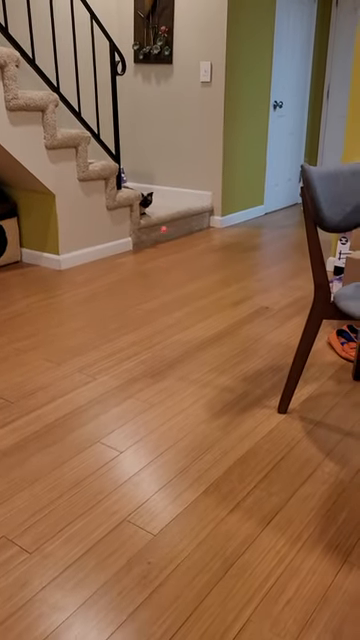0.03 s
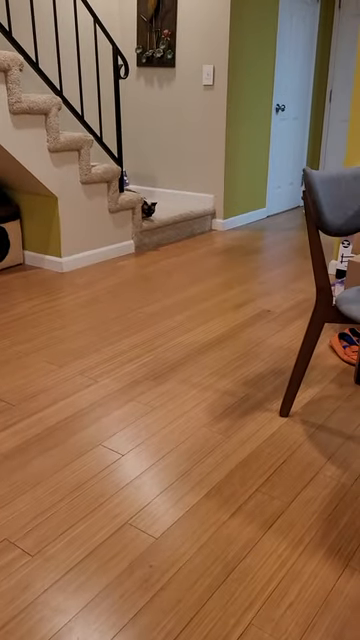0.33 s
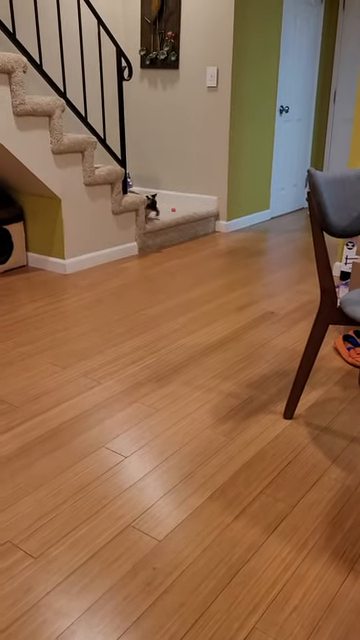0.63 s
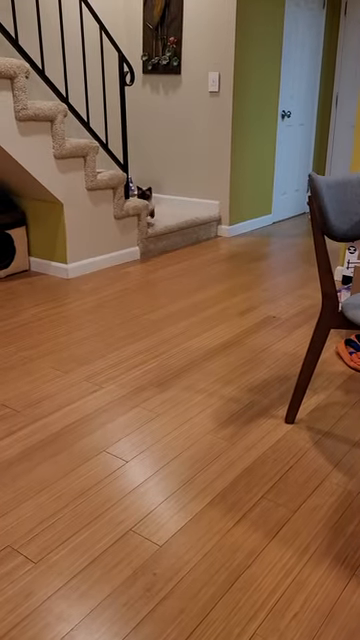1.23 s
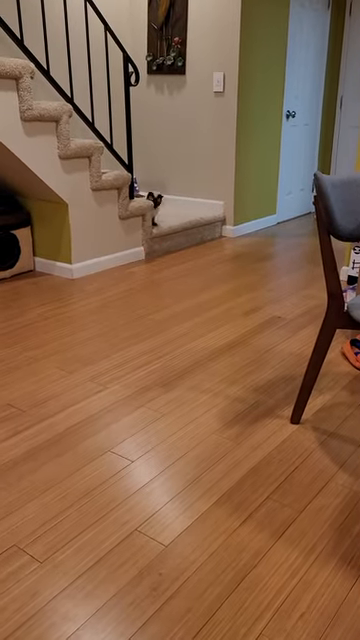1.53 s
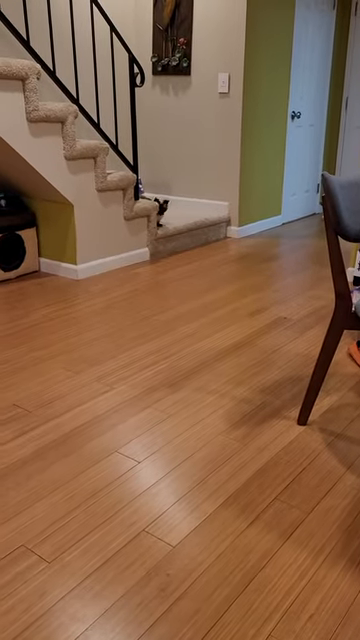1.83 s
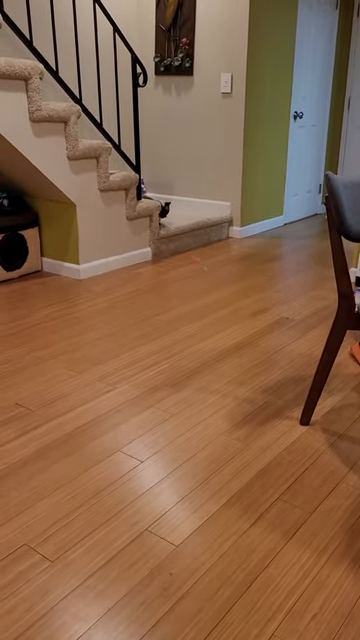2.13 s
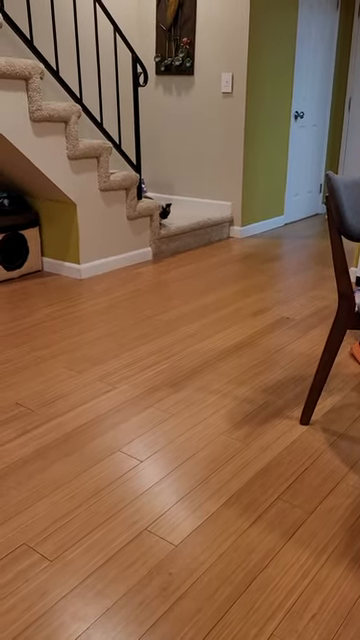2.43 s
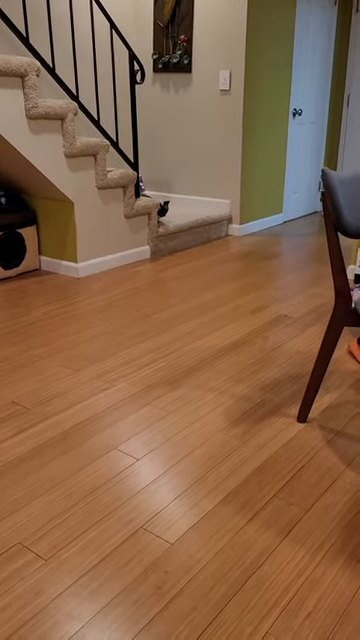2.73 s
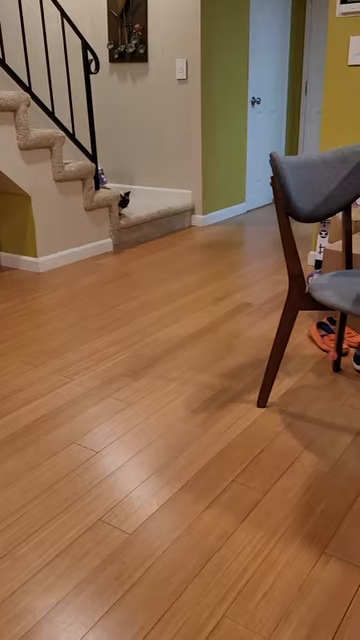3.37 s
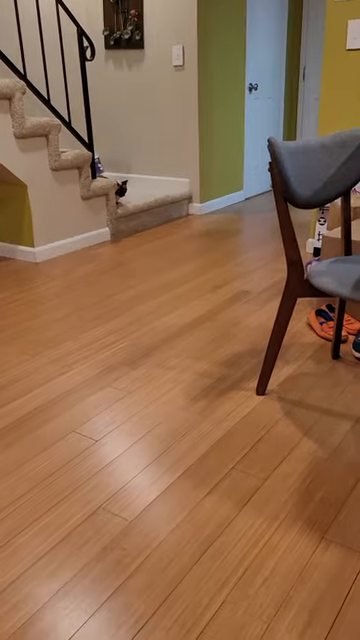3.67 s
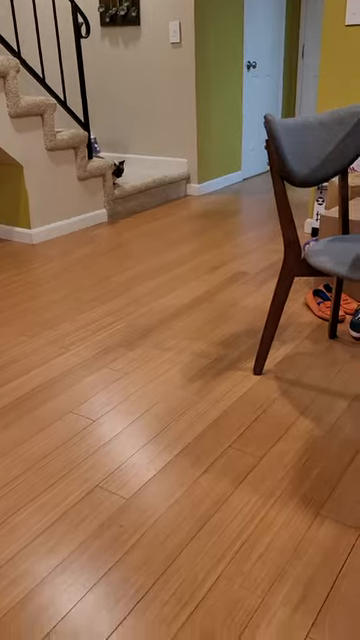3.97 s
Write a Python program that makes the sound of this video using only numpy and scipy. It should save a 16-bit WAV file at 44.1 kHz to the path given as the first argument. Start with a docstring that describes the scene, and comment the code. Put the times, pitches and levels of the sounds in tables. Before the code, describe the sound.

A small ball bounces on a wooden floor about twice a second, quickening toward the end. Each hollow thump sounds slightly different and rings briefly in a quiet living room, a few metres from the microphone.

```python
"""Ball bouncing in a living room

A small ball bounces again and again on a wooden floor, a few metres from a stereo microphone.
Each landing briefly rings the boards, a little differently at each spot, and the ball adds its own
tock; the room carries the thud on for a third of a second. Behind it: low rumble, hiss, appliance
hum, a thin electrical whine and, near the end, one tiny click close by."""
import sys
import numpy as np
from scipy import signal
from scipy.io import wavfile
from scipy.ndimage import uniform_filter1d

SR = 44100
rng = np.random.default_rng(int(sys.argv[2]) if len(sys.argv) > 2 else 0)


def file_out(sig):
    """Save sig as 16-bit WAV at sys.argv[1]."""
    # one column per channel
    cols = np.atleast_2d(sig).T
    # limit, then scale
    lim = np.clip(cols, -1, 1)
    pcm = np.round(lim * 32767).astype(np.int16)
    wavfile.write(sys.argv[1], SR, pcm)


N = 176400

# how alike the room's diffuse sound is on the two sides of the microphone: frequency_hz, correlation
STEREO_LIKENESS = [(60, 0.76), (200, 1), (340, .1), (520, -0.077), (1200, -0.47), (2000, -0.51),
                   (3200, -0.11), (10000, -0.24)]


def from_db(db):
    """Decibels to gain."""
    return 10 ** (np.asarray(db) / 20)


def rms_one(x):
    """Scale to rms 1."""
    return x / np.sqrt(np.mean(x ** 2) + 1e-20)


def at_hz(points, hz):
    """Read a table on a log-frequency axis."""
    frequencies, values = np.transpose(points)
    return np.interp(np.log(hz), np.log(frequencies), values)


def pan(db):
    """Left and right gains for a level difference; positive leans left."""
    return from_db(np.array([[db], [-db]]) / 2)


def add(out, x, start_s):
    """Mix x into out from start_s, dropping what falls outside the scene."""
    start = int(start_s * SR)
    a, b = max(start, 0), min(start + x.shape[-1], N)
    if b > a:
        out[:, a:b] += x[..., a - start:b - start]


def resonance(x, hz, width_hz):
    """A steep-sided resonance with gain 1 on top."""
    low = np.sqrt(hz ** 2 + width_hz ** 2 / 4) - width_hz / 2
    edges = np.clip([low, low + width_hz], 5, .48 * SR)
    return signal.sosfilt(signal.butter(2, edges, "band", fs=SR, output="sos"), x + 1e-18)


def diffuse_bands(size):
    """Third-octave bands of noise, alike on both sides in the bass and partly opposed higher up."""
    edges = 22 * 2 ** (np.arange(30) / 3)
    centres = np.sqrt(edges[1:] * edges[:-1])
    for hz, width in zip(centres, np.diff(edges)):
        mid, side = resonance(rng.standard_normal((2, size + SR // 4)), hz, width)[:, -size:]
        alike = at_hz(STEREO_LIKENESS, hz)
        mid, side = np.sqrt((1 + alike) / 2) * mid, np.sqrt((1 - alike) / 2) * side
        yield hz, width, np.array([mid + side, mid - side])


def landing(thump_hz, knock_hz, clack_hz, knock_db, clack_db, *group_db):
    """One blow rings boards and ball; the microphone hears them directly and through the room."""
    # resonances heard at every landing: the floor's boom, overtones and tick, and the ball's own tock
    # (1967 Hz, grouped with the overtones): pitch_hz, width_hz, level_db, direct_db
    landing_modes = { "boom": [(113, 110, -27, 4), (187.5, 54, -11, -13.5), (253, 87, -5.5, 7)],
                     "overtones": [(1041, 200, -23, 4), (1270, 180, -22, 2.5), (1630, 290, -22.5, -9),
                     (1967, 299, -27, 8.5), (2805, 450, -35.5, 2.5), (3623, 690, -43, -2.5),
                     (5037, 1200, -51.5, -3.5)], "tick": [(5564, 910, -52.5, -12.5),
                     (8090, 510, -55.5, -9.5), (12000, 5000, -66, -12.5)]}
    # the board under the ball: spot_db, pitch_hz, width_hz, level_db, direct_db
    modes = [(0, thump_hz, 171.7, 0.8, 0),
             (knock_db, knock_hz, 133, -0.5, 0),
             (clack_db, clack_hz, 181, -24.5, 11.8)]
    for group, spot_db in zip(landing_modes.values(), group_db):
        modes += [(spot_db, *mode) for mode in group]
    blow = signal.unit_impulse(4096)
    t = np.arange(len(blow)) / SR
    impact, direct = 0, 0
    for spot_db, hz, width, db, direct_db in modes:
        contact_hz = min(2.32 * hz, .45 * SR)   # the soft contact rounds off each resonance above this
        soft_blow = signal.sosfilt(signal.butter(2, contact_hz, fs=SR, output="sos"), blow)
        ring = from_db(db + spot_db) * resonance(soft_blow, hz, width)
        travel_s = 0.00053 * np.sqrt(1000 / hz)   # lower bending waves cross the boards more slowly
        ring = np.interp(t - travel_s, t, ring, left=0)
        impact = impact + ring
        right_lag_s = 0.00027 if hz < 900 else 0   # the bass reaches the right side later
        right = np.interp(t - right_lag_s, t, ring)
        direct = direct + from_db(direct_db - 8.5) * np.array([ring, right])
    room = reverberation() + standing_waves() + wall_echoes()
    out = signal.fftconvolve(room, impact[None], axes=1)
    out[:, :len(t)] += direct
    return out


def reverberation():
    """Dense reflections from one spot on the floor build up and die away, with even energy per hertz."""
    # decay of the living room: frequency_hz, t60_s
    decay_times = [(100, 0.15), (250, 0.44), (450, 0.34), (900, 0.39), (1800, .35), (3500, 0.33),
                   (7000, 0.17), (14000, 0.31)]
    delay_s, build_s, early_t60_s = 0.0014, .004, .13
    t = np.arange(SR // 2) / SR
    build = 1 - np.exp(-np.maximum(t - delay_s, 0) / build_s)
    early = 0.17 * from_db(-60 * t / early_t60_s)   # off nearby walls and furniture
    out = 0
    for hz, width, noise in diffuse_bands(len(t)):
        tail = from_db(-60 * t / at_hz(decay_times, hz))
        band = noise * build * (tail + early)
        energy = np.sum(band ** 2, axis=1, keepdims=True)
        out = out + band * np.sqrt(2 * width / SR / energy)
    return out


def standing_waves():
    """Every landing stirs a few room modes that stand out of the tail."""
    # standing waves of the room: pitch_hz, level_db
    room_modes = [(401, 7), (749, 4.5), (928, 4.5), (1023, 3), (1299, 0), (1569, 3), (1897, 10.5),
                  (2164, 6), (2702, 2), (2902, 9), (2993, 2.5)]
    t60_s, lag_rad = 0.24, np.array([[0], [1.84]])   # the right side lags
    t = np.arange(SR // 2) / SR
    rate = np.log(1000) / t60_s
    waves = sum(from_db(db) * np.sin(2 * np.pi * hz * t - lag_rad) for hz, db in room_modes)
    return 2 * rate / SR * np.exp(-rate * t) * waves


def wall_echoes():
    """Single reflections, whose paths change a little with each spot and reach the two sides apart."""
    # distinct echoes from the walls: delay_s, level_db, left_over_right_db
    echoes = [(.007, -15, -2), (0.022, -13, 2), (.035, -15.5, -2), (.049, -20, -3)]
    out = np.zeros((2, SR // 2))
    for delay_s, db, side_db in echoes:
        arrival = (delay_s * rng.uniform(.95, 1.05, 2) * SR).astype(int)
        out[[0, 1], arrival] += from_db(db) * pan(side_db)[:, 0]
    return out


def ball():
    """The ball strikes a new spot each time, a few metres off; the scene opens in a landing's tail."""
    # landings and how each one rings: start_s, strength_db, left_over_right_db,
    # thump_hz, knock_hz, clack_hz, knock_db, clack_db, boom_db, overtones_db, tick_db
    landings = [ (-0.105, 1.5, 0, 348, 567, 1500, -8, -7, -5.5, -5, -15),
                (0.409, -2, -1.5, 405, 645, 1120, -1, -1, -5, -6.5, -5.5),
                (0.9055, 1, -0.5, 443, 634, 1860, 0.5, -12, 1, 1.5, -2),
                (1.559, 1.5, -0.5, 427, 714, 2790, -1.5, -4.5, 3, 8.5, 6),
                (2.0244, -1, -.5, 388, 660, 1842, -8, -7.5, -0.5, -3.5, -1.5),
                (2.4732, 1, -0.5, 355, 646, 1837, -7, -7, -12, 0.5, 11),
                (2.888, 0, -1, 323, 605, 1843, -7.5, -12.5, -12, -8.5, -2.5),
                (3.2828, -1.5, -0.5, 440, 846, 1340, -5, 13, 0.5, 9.5, 7),
                (3.615, 1.5, -1.5, 349, 540, 1407, -22, -9, -11.5, -9.5, -12),
                (3.9448, -4, -0.5, 438, 582, 1797, -18, 6, -1.5, 4.5, -7)]
    gain_db = 22
    out = np.zeros((2, N))
    for start_s, db, side_db, *spot in landings:
        add(out, from_db(gain_db + db) * pan(side_db) * landing(*spot), start_s)
    return out


def room_tone():
    """Low rumble all round the microphone, and a hiss that settles in the first second and a half."""
    # spectrum of the quiet room: frequency_hz, relative_density_db
    spectrum = [(25, -13), (42, -19), (60, -12.5), (90, 8.5), (130, -15), (250, -0.5), (400, -17.5),
                (700, -11), (1100, -31), (2500, -38.5), (5000, -43.5), (9000, -51), (15000, -51.5)]
    # lift of the hiss above 1 kHz: time_s, gain_db
    hiss_lift = [(0, 18), (.35, 11.5), (0.801, 11), (1.401, 9), (4, 9)]
    hiss = from_db(np.interp(np.arange(N) / SR, *np.transpose(hiss_lift)))
    out = 0
    for hz, _, noise in diffuse_bands(N):
        band = from_db(at_hz(spectrum, hz) - 48.5) * noise
        out = out + band * (hiss if hz > 1000 else 1)
    return out


def appliance_hum():
    """Household appliances hum in three narrow bands of noise, with a band of whine high above."""
    # bands of hum and whine: pitch_hz, width_hz, level_db
    bands = [(55.7, 6.4, -76), (88.5, 16, -82), (518.4, 6.9, -81), (7400, 370, -99)]
    out = 0
    for hz, width, db in bands:
        left, unrelated = resonance(rng.standard_normal((2, N + SR)), hz, width)[:, SR:]
        alike = at_hz(STEREO_LIKENESS, hz)
        right = alike * left + np.sqrt(1 - alike ** 2) * unrelated
        out = out + from_db(db) * rms_one(np.array([left, right]))
    return out


def electrical_whine():
    """Thin electrical tones that wander slightly in pitch and slowly fade."""
    # tones of the whine: pitch_hz, midway_level_db
    tones = [(3661, -101), (5103, -110), (7025, -105), (7143, -98.5), (7323, -99)]
    wander_hz, fade_db_per_s, lag_rad = 5, 1.9, np.array([[0], [.8]])   # the right side lags
    t = np.arange(N) / SR
    out = 0
    for hz, db in tones:
        wander = wander_hz * rms_one(uniform_filter1d(rng.standard_normal(N), size=2000))
        phase = 2 * np.pi * np.cumsum(hz + wander) / SR - lag_rad
        out = out + from_db(db) * np.sqrt(2) * np.sin(phase)
    return out * from_db(-fade_db_per_s * (t - t.mean()))


def whistle():
    """A faint, narrow whistling hiss that swells near the end."""
    # swell of the whistle: time_s, level_db
    swell = [(0, -87), (2.601, -89.5), (3.201, -84.5), (4, -84.5)]
    level = from_db(np.interp(np.arange(N) / SR, *np.transpose(swell)))
    return level * rms_one(resonance(rng.standard_normal((2, N)), hz=3800, width_hz=170))


def stray_click():
    """A tiny dry click close to the microphone."""
    # the click and its brief ring: start_s, level_db, pitch_hz, width_hz
    clicks = [(3.387, -48, 7000, 3000)]
    out = np.zeros((2, N))
    for start_s, db, hz, width in clicks:
        add(out, from_db(db) * resonance(signal.unit_impulse(512), hz, width), start_s)
    return out


def scene():
    """The ball in the quiet living room, whose background leans a touch to the right."""
    bounces = ball()
    background = room_tone() + appliance_hum() + electrical_whine() + whistle()
    return bounces + background * pan(db=-1.9) + stray_click()


def record(dry):
    """The sound fades in quickly at the very start, and the microphone loses its highest treble to a steep low-
    pass."""
    fade_in_s, cutoff_hz = .006, 15750
    fade_in = np.minimum(np.arange(N) / SR / fade_in_s, 1)
    low_pass = signal.ellip(10, .1, 80, cutoff_hz, fs=SR, output="sos")
    return signal.sosfilt(low_pass, dry * fade_in)


dry = scene()
out = record(dry)
file_out(out)
```